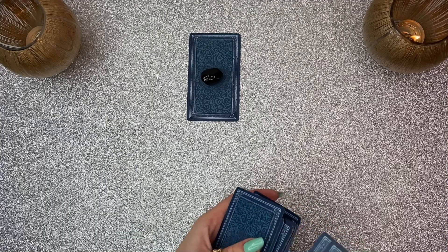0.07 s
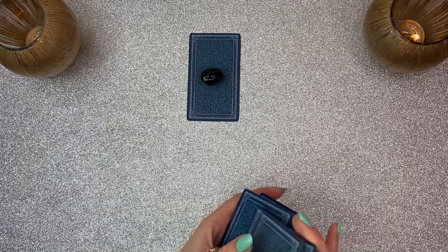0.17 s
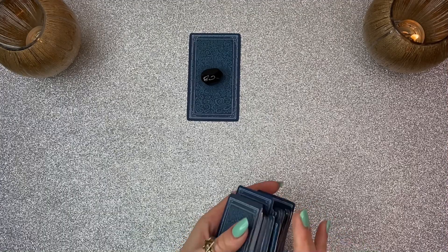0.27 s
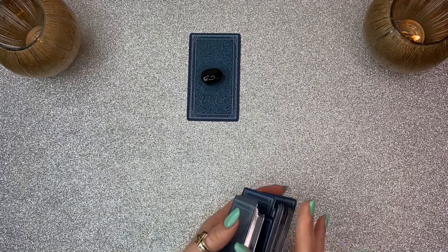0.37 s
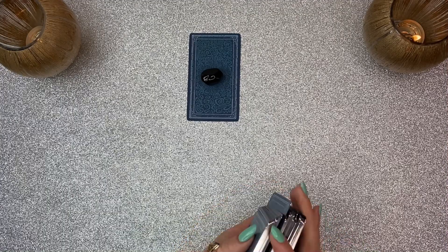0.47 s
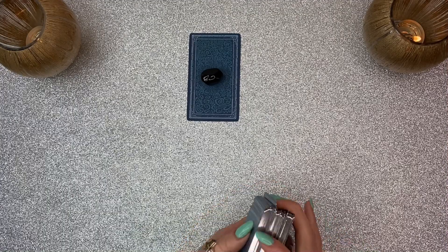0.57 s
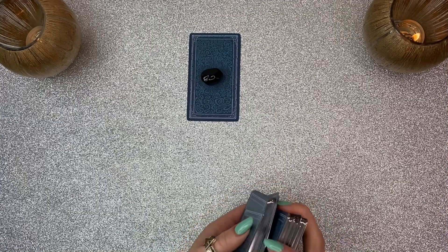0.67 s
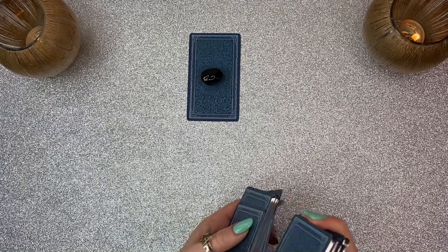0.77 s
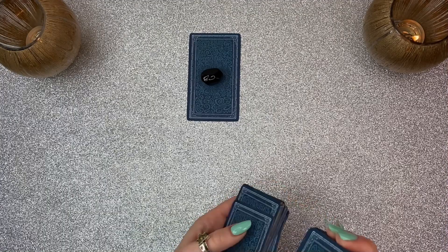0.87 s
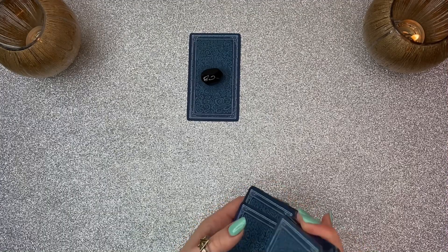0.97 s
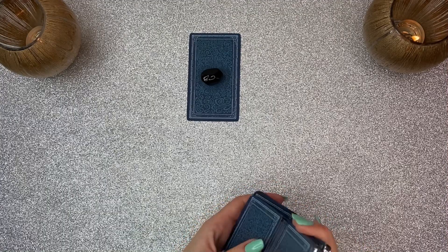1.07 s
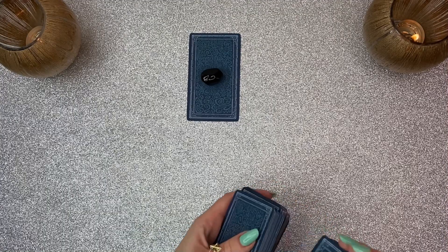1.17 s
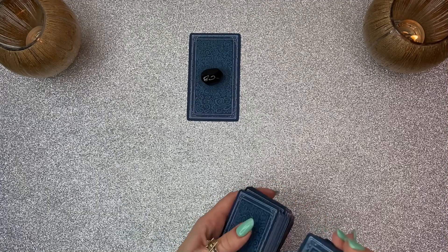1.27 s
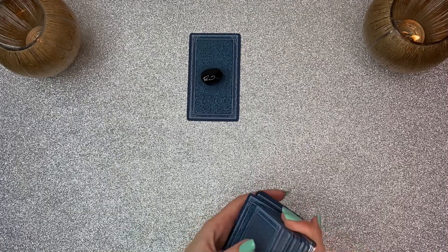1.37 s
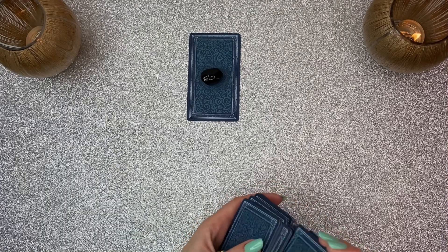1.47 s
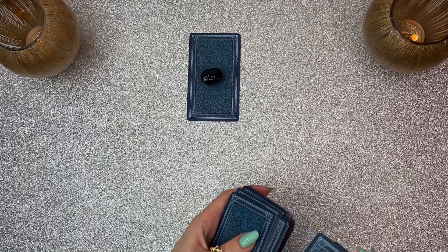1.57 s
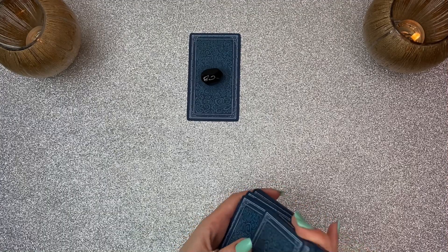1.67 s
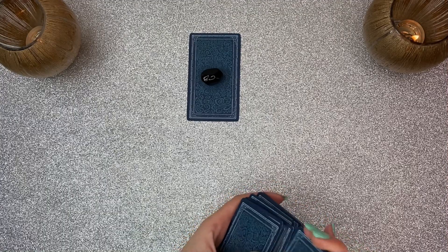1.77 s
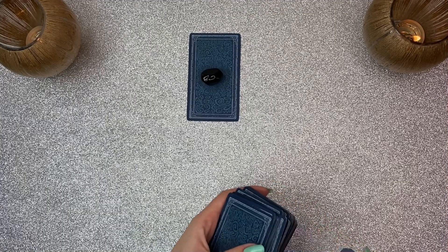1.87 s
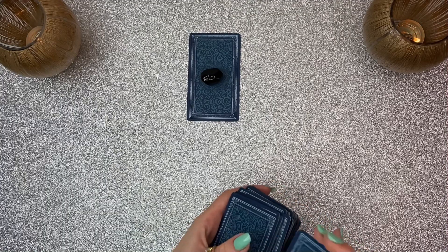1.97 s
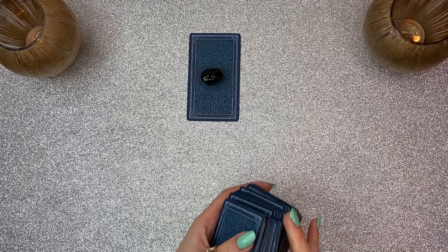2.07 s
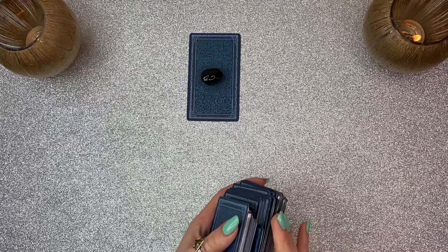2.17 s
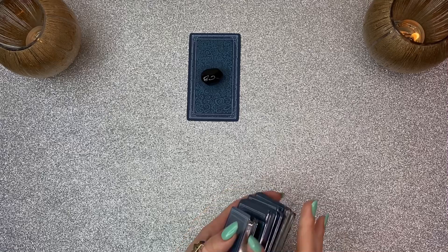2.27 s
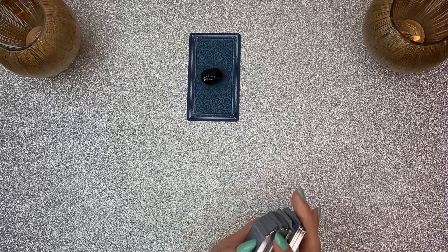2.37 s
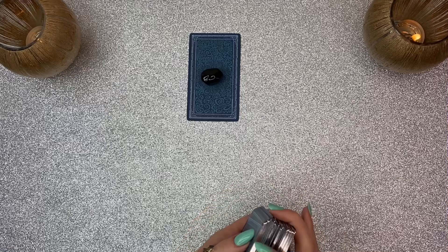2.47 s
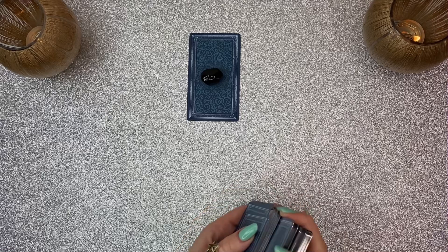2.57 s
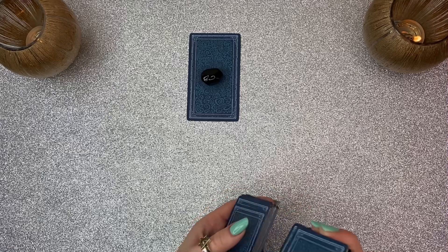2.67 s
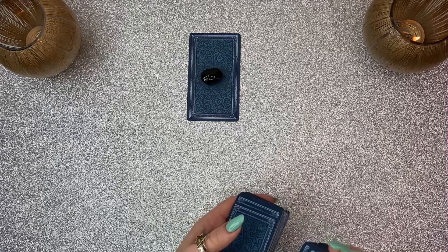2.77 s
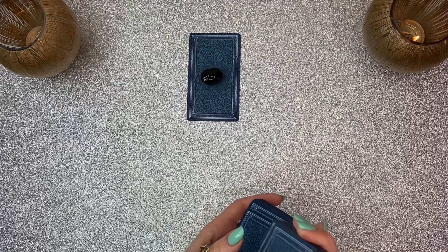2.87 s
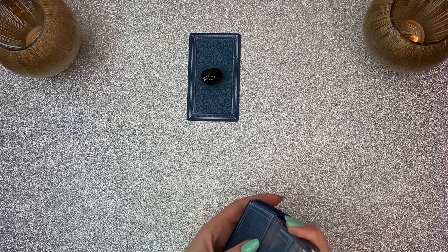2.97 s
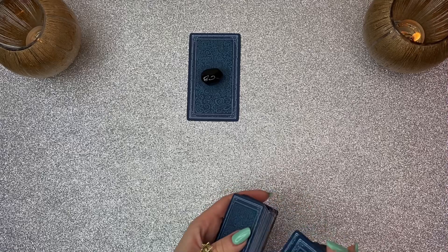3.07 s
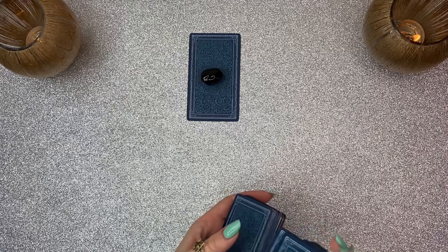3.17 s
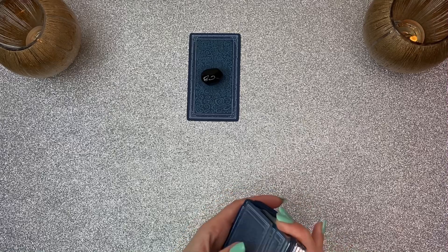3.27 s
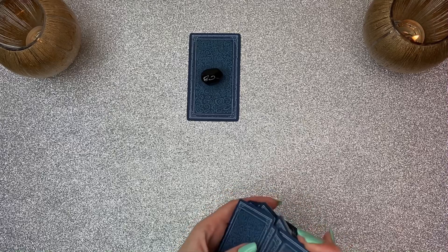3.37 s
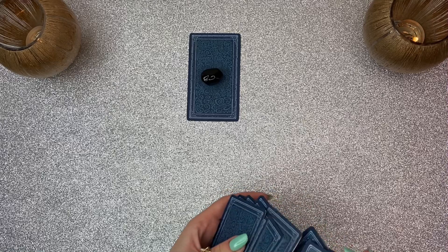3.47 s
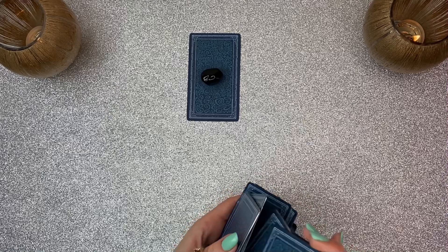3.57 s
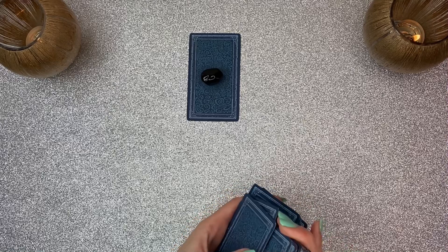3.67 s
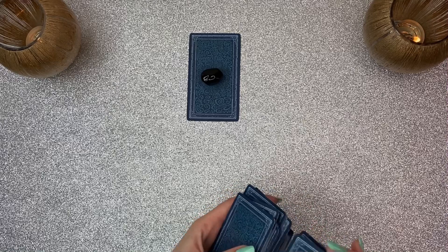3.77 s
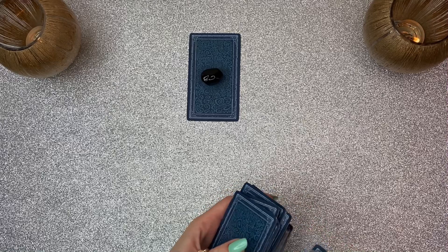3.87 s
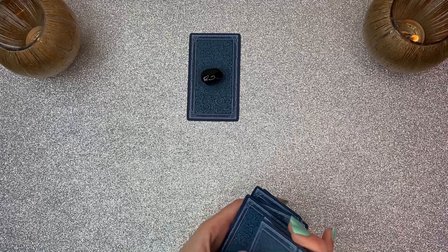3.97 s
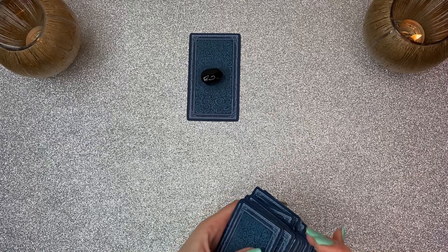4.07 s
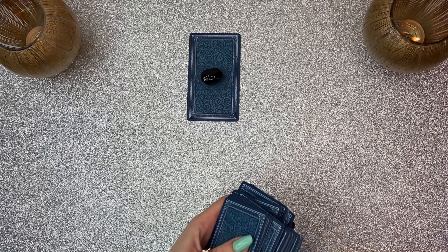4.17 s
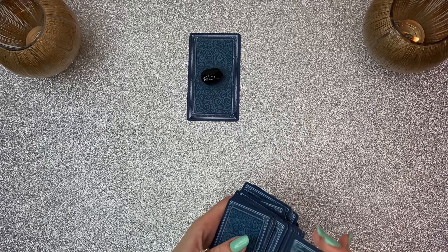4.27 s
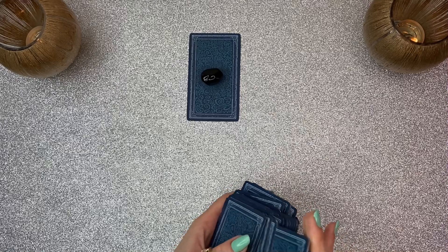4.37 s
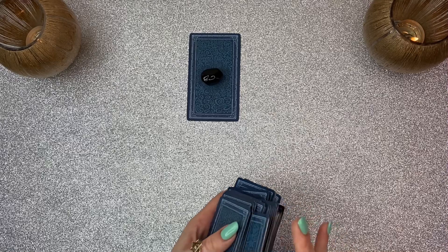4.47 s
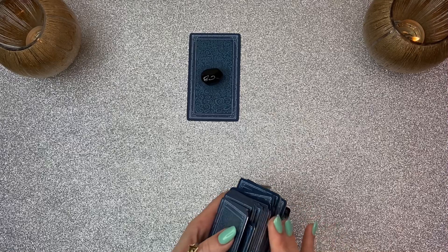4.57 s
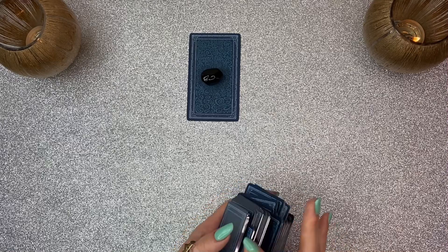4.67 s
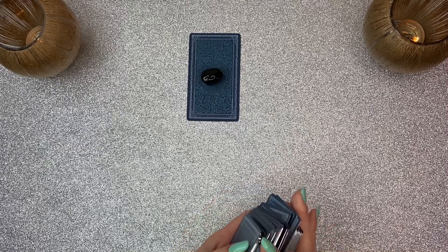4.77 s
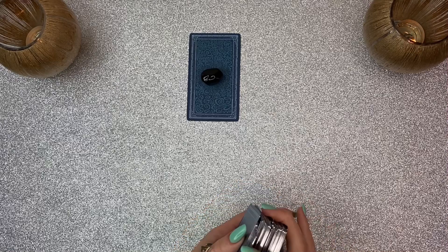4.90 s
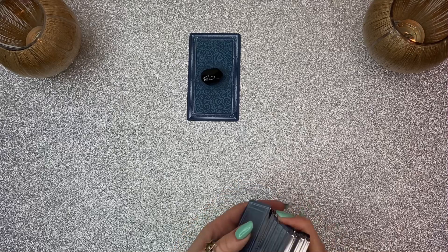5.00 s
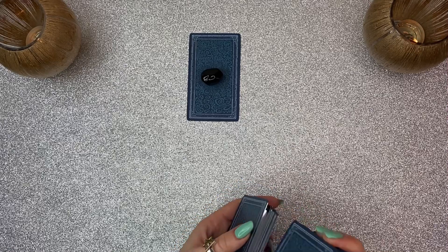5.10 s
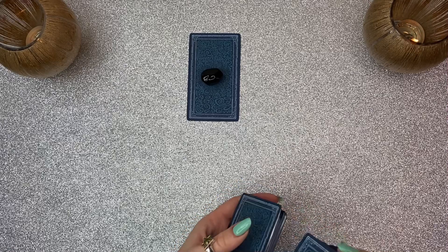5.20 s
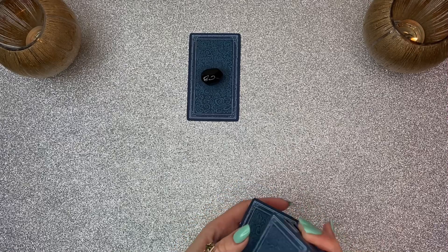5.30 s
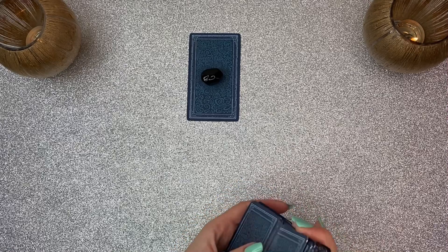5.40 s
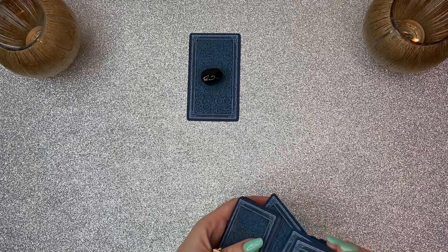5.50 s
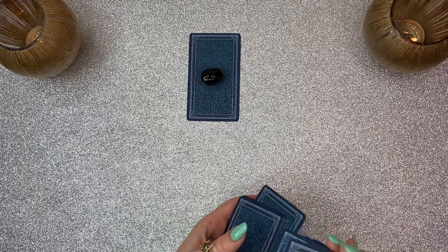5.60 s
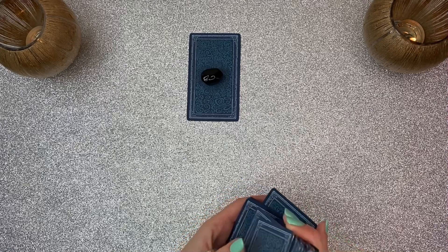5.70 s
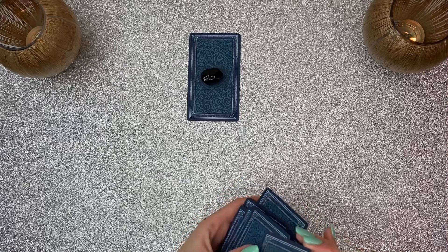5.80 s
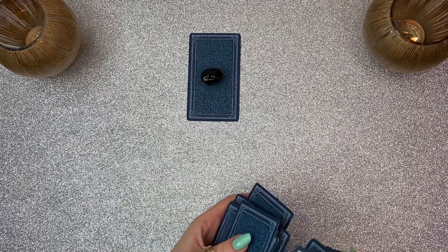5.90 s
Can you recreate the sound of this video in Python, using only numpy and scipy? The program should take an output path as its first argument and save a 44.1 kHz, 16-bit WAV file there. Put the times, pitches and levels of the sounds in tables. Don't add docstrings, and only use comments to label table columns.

```python
import sys
import numpy as np
from scipy import signal
from scipy.fft import rfft, irfft
from scipy.io import wavfile

SR = 44100
rng = np.random.default_rng(int(sys.argv[2]) if len(sys.argv) > 2 else 0)


def wav_record(signal):
    frames = np.transpose(np.atleast_2d(signal))
    bounded = np.clip(frames, -1, 1)
    quanta = np.round(bounded * 32767).astype(np.int16)
    wavfile.write(sys.argv[1], SR, quanta)


def ratio(d):
    e = np.asarray(d, float) / 20
    return 10 ** e


N = 261954


def rms_one(x):
    return x / np.sqrt(np.mean(x ** 2) + 1e-20)


def at_hz(points, hz):
    table_hz, values = np.array(points).T
    return np.interp(np.log(hz + 1), np.log(table_hz), values)


def shaped(x, spectrum):
    return irfft(rfft(x) * ratio(at_hz(spectrum, np.fft.rfftfreq(N, 1 / SR))), N)


def cut(x, hz, kind, order=2):
    sos = signal.butter(order, np.clip(hz, 10, .45 * SR), kind, fs=SR, output="sos")
    return signal.sosfilt(sos, x)


def resonance(x, hz, width_hz):
    r = np.exp(-np.pi * width_hz / SR)
    poles = [1, -2 * r * np.cos(2 * np.pi * hz / SR), r * r]
    return signal.lfilter([(1 - r * r) / 2, 0, (r * r - 1) / 2], poles, x)


def grit(shape, spread_db):
    sizes_db = spread_db * np.minimum(rng.exponential(1, shape), 4)
    return rms_one(rng.standard_normal(shape) * ratio(sizes_db))


# mode_hz [Hz], level_db [dB], t60_s [s]
PILE = [(280, -6.5, 0.027), (448.2, -13, 0.036), (580, 1, 0.021), (730, 6, 0.011), (840, 6.5, 0.013),
        (1055, 3.5, 0.0064)]
# start_s [s], peak_db [dB], pocket_hz [Hz], thump_db [dB re peak]; the next three alike
EDGE_FIRST = [(0.16, -42, 1170, -9.5), (0.801, -47.5, 848, -13), (0.81, -57, 890, -18),
              (1.032, -36, 1910, -7.5), (2.008, -25, 3140, -39), (2.055, -35.5, 3920, -8),
              (2.614, -62, 6500, -25), (2.631, -51, 5300, -30), (2.893, -41, 5240, -8.5),
              (2.927, -29, 1350, -6), (3.052, -39.5, 1070, -6), (3.28, -37.5, 2400, -27),
              (3.606, -35, 1480, -34), (3.646, -49.5, 1490, -4), (4.79, -45.5, 4540, -44),
              (5.11, -56.5, 544, -9), (5.461, -35, 430, -1), (5.488, -42, 417, 9.5),
              (5.886, -45, 1210, 0.5)]
FLAT = [(0.196, -33, 3300, -21), (0.512, -63, 2920, -37), (0.775, -45, 1710, -6), (1.104, -30, 4840, -23),
        (1.354, -37, 1690, -12.5), (1.489, -28.5, 3700, -25), (1.776, -31.5, 1210, -12),
        (1.797, -22, 2920, -8.5), (2.471, -64, 5270, -25), (2.502, -41.5, 3200, -39),
        (3.033, -37, 4560, -10.5), (3.267, -25.5, 1380, -55), (3.554, -46, 5100, -39),
        (3.623, -30.5, 5000, -28), (3.737, -37, 3270, -10.5), (3.755, -29, 4500, -32),
        (3.772, -32.5, 4670, -12.5), (4.001, -33, 5710, -15), (4.309, -18.5, 1976, -52),
        (4.778, -50, 5200, -38), (5.368, -30.5, 1590, -16.5), (5.385, -28, 1450, -13.5),
        (5.738, -30, 1770, -17.5), (5.817, -26.5, 950, -9.5)]
CUPPED = [(1.434, -37.5, 2360, -19), (1.716, -21, 1235, -46), (2.604, -50, 1300, -12),
          (2.659, -59, 1210, -24), (2.684, -47, 3020, -30), (2.773, -53.5, 1440, -13),
          (3.217, -56.5, 5500, -24), (3.38, -36.5, 3080, -27), (3.4, -38.5, 3240, -11),
          (3.593, -33.5, 3230, -17), (4.115, -28, 2700, -21), (4.306, -11, 3530, -47),
          (4.322, -28.5, 2400, -32), (4.37, -30, 3000, -17), (4.61, -46.5, 960, -1),
          (5.04, -41.5, 1804, -18.5), (5.38, -25.5, 1510, -21), (5.448, -47, 2730, -4),
          (5.798, -34, 1550, -15)]
SCUFFED = [(0.207, -38.5, 3620, -7.5), (0.287, -36, 4700, -33), (0.518, -36.5, 3000, -43),
           (0.66, -64, 4970, -43), (1.018, -52, 2700, -27), (1.691, -33.5, 5900, -40),
           (2.229, -33.5, 4650, -37), (3.979, -45.5, 5860, -18), (5.357, -45, 1450, -11),
           (1.376, -29, 6300, -26.5), (1.45, -38, 3300, -9), (4.685, -39, 2960, -23)]
# landings [table], crack_db [dB re peak], length_ms [ms]
LANDINGS = [(EDGE_FIRST, -1.5, 2.4), (FLAT, -10.5, 2.7), (CUPPED, -38, 2.8), (SCUFFED, -13.5, 7.0)]


def slaps():
    size, lead = SR // 10, SR // 80
    rush_db, rush_ms = -31, 5.3
    landings = sorted((*row, crack_db, ms) for rows, crack_db, ms in LANDINGS for row in rows)
    t = np.arange(size) / SR
    since_contact = t - lead / SR
    bursts = grit((len(landings), size), spread_db=6.5)
    strengths = rng.standard_normal((len(landings), len(PILE)))
    rush = ratio(rush_db) * np.exp(-np.abs(since_contact) * 1000 / rush_ms)
    out = np.zeros(N + size)
    for landing, noise, strength in zip(landings, bursts, strengths):
        start_s, peak_db, pocket_hz, thump_db, crack_db, ms = landing
        age = 1000 * np.maximum(since_contact, 0) / max(ms, .6)
        snap = signal.unit_impulse(size, lead + int(0.24 * ms * SR / 1000))
        swell = (1 - np.exp(-age / 0.45)) * np.exp(-age)
        burst = np.roll(noise, lead) * (swell + rush) + 1.7 * snap
        pocket = resonance(burst, pocket_hz, 170 + pocket_hz * (pocket_hz / 3600) ** 2)
        crack = cut(cut(burst, 930, "high"), 6100, "low", order=1)
        modes = 0
        for (hz, db, t60), k in zip(PILE, strength):
            modes = modes + ratio(db + 2 * k - 60 * t / t60) * np.sin(2 * np.pi * hz * t)
        thump = cut(signal.fftconvolve(snap + 0.027 * burst, modes)[:size], 290, "high")
        parts = [(pocket, -4), (thump, thump_db + 1.5), (crack, crack_db + 8.0)]
        packet = sum(ratio(db) * part / np.max(np.abs(part)) for part, db in parts)
        out[round(start_s * SR) - lead:][:size] += ratio(peak_db) * packet
    return out[:N]


# start_s [s], length_ms [ms], start_db [dB], end_db [dB]; the next three alike
PRESSED = [(0.335, 151, -51.5, -66), (0.5, 89, -56, -67), (1.425, 49, -48.5, -57), (1.69, 35.4, -53.5, -42),
           (1.74, 42, -43.5, -53.5), (2.01, 76, -42.5, -50.5), (2.46, 94, -63, -63),
           (2.893, 117, -52.5, -49), (3.21, 55, -75.5, -65.5), (3.35, 114, -51, -62),
           (3.555, 36, -48.5, -60), (3.604, 44, -43.5, -55), (3.95, 35, -88.5, -66), (3.979, 60, -46, -50),
           (4.65, 70, -52, -59.5), (5.352, 45, -50.5, -47.5), (5.41, 54, -55.5, -56.5),
           (5.74, 60, -53.5, -51.5)]
LOOSE = [(0.157, 77.5, -48, -49), (0.278, 43, -48.5, -55.5), (0.58, 107, -63.5, -53),
         (0.67, 112, -56, -69.5), (1.0, 24, -66, -54.5), (1.03, 55, -46, -46.5), (1.32, 42, -62, -80),
         (1.352, 46, -52.5, -50.5), (2.09, 90, -51, -60), (2.2, 37, -72, -48), (2.235, 78, -53.5, -58.5),
         (2.33, 54, -64, -70), (2.39, 73, -56.5, -70.5), (3.268, 120, -50, -65.5), (3.47, 88, -72, -55.5),
         (3.675, 86, -46.5, -58.5), (4.04, 77, -58, -66), (4.27, 16, -72, -74.5), (4.308, 120, -47.5, -55),
         (4.45, 115, -50.5, -51), (4.6, 44, -70, -61), (4.76, 107, -61, -56), (4.92, 85, -60.5, -63),
         (5.8, 47, -50, -45)]
MUFFLED = [
    (0, 65, -49.5, -70),
    (0.77, 87, -68, -73),
    (2.86, 32, -71, -79),
    (3.03, 33, -49, -68),
    (5.875, 51, -52, -67.5),
]
BRUSHED = [
    (0.87, 43, -66, -72.5),
    (2.57, 60, -77, -68),
    (5.0, 88, -68, -65),
    (5.1, 46, -90, -78),
    (5.69, 43.4, -97, -55),
]
# slides [table], body_db [dB re rub], edge_db [dB re rub]
GRIPS = [(PRESSED, -15.5, -3.9), (LOOSE, -24, -4), (MUFFLED, -11, -18), (BRUSHED, -11, 6.8)]


def pressure(grip_share, release_ms):
    powers = np.zeros((3, N + SR))
    strokes = [(*row, *tone) for rows, *tone in GRIPS for row in rows]
    for start_s, ms, start_db, end_db, body_db, edge_db in strokes:
        age = np.arange(int((ms + 6 * release_ms) * SR / 1000)) * 1000 / SR
        take_hold = 1 - np.exp(-age / (grip_share * ms))
        let_go = np.exp(-np.maximum(age - ms, 0) / release_ms)
        drift = ratio(np.interp(age, [0, ms], [start_db, end_db]))
        power = (drift * take_hold * let_go) ** 2
        powers[:, round(start_s * SR):][:, :len(age)] += power * ratio([[0], [2 * body_db], [2 * edge_db]])
    return np.sqrt(powers[:, :N])


def flutter(rate_hz, depth_db):
    return ratio(depth_db * rms_one(cut(rng.standard_normal(N), rate_hz, "low")))


# band_hz [Hz], level_db [dB per Hz]
CARD = [(200, -31), (450, -22.5), (900, -18), (1450, -9), (2200, -7.5), (3000, -4), (4200, -3), (5400, -3),
        (7000, -6), (9000, -4), (12000, -7), (14000, -12.5), (15800, -13)]


def slide():
    edge_hz = 8000
    rub, body, edge = pressure(grip_share=.13, release_ms=8.0)
    ticks = (rng.random(N) < 70 / SR) * rng.standard_normal(N)
    faces = shaped(grit((2, N), spread_db=4.0) + ratio(19) * ticks, CARD)
    splits_hz = np.geomspace(1150, edge_hz, 7)
    patches = 0
    for k in range(6):
        patches = patches + cut(faces[k % 2], splits_hz[k:k + 2], "band") * flutter(17, depth_db=1.45)
    rub = rub * ratio(-3.0) * rms_one(patches)
    body = body * ratio(-2.5) * rms_one(cut(faces[1], [330, 1150], "band")) * flutter(30, depth_db=1.0)
    edge = edge * ratio(1.0) * rms_one(cut(faces[0], edge_hz, "high", order=3))
    return (rub + body + edge) * flutter(32, depth_db=0.78)


# start_s [s], peak_db [dB]
TAPS = [
    (5.461, -46),
    (5.489, -43.5),
    (5.758, -50.5),
    (5.82, -56),
]
# mode_hz [Hz], level_db [dB], t60_s [s]
TABLE = [(117.6, -12, 0.22), (164.3, 4.5, 0.2), (211, -6, 0.054), (302, -5, 0.04)]


def taps():
    t = np.arange(SR // 4) / SR
    thud = sum(ratio(db - 60 * t / t60) * np.sin(2 * np.pi * hz * t) for hz, db, t60 in TABLE)
    knocks = np.zeros(N)
    for start_s, peak_db in TAPS:
        knocks[round(start_s * SR)] = ratio(peak_db)
    return signal.fftconvolve(knocks, thud / np.max(np.abs(thud)))[:N]


# peak_s [s], peak_db [dB]
SWINGS = [(0.0, -61), (0.21, -65.5), (0.4, -74), (0.58, -71), (0.79, -68.5), (1.06, -60.5), (1.4, -59.5),
          (1.52, -63), (1.82, -60.5), (2.03, -67), (2.251, -68), (2.45, -72.5), (2.65, -75), (2.94, -61),
          (3.06, -61), (3.29, -62.5), (3.5, -71), (3.69, -63.5), (3.9, -71), (4.0, -69), (4.12, -67.5),
          (4.348, -57.5), (4.52, -64), (4.75, -68), (5.05, -75), (5.23, -71), (5.51, -52.5), (5.76, -55.5)]


def stir():
    swell_db_per_s, settle_db_per_s = 170.5, 135
    peak_s, peak_db = np.transpose(SWINGS)[:, :, None]
    age = np.arange(N) / SR - peak_s
    level_db = np.max(peak_db + np.minimum(swell_db_per_s * age, -settle_db_per_s * age), axis=0)
    mid, side = rng.standard_normal((2, N))
    rumble = cut(mid + 0.12 * side * np.array([[1], [-1]]), [45, 140], "band")
    return ratio(level_db - 3.5) * rms_one(rumble)


# band_hz [Hz], t60_s [s]
ROOM_T60 = [(150, 0.55), (700, 0.14), (1500, 0.52), (3000, 0.41), (6000, 0.32), (10000, 0.2), (15000, 0.14)]
# band_hz [Hz], level_db [dB per Hz]
ROOM_LEVEL = [(100, -6.5), (400, 4.5), (900, -4.5), (1500, -3), (3000, -5.5), (6000, -1), (12000, -6.5)]
# band_hz [Hz], likeness [0 to 1]
ALIKE = [(100, 0.65), (400, 0.27), (1200, 0.16), (3000, 0.033)]


def room(x, early_db, early_ms, late_db):
    size = SR * 2 // 3
    t = np.arange(size) / SR
    white = rng.standard_normal((3, 2, size))
    tail = 0
    for k, hz in enumerate(80 * 2 ** np.arange(0, 8, .5)):
        band = cut(white[k % 2], [hz / 1.19, hz * 1.19], "band")
        tail = tail + band * ratio(at_hz(ROOM_LEVEL, hz) - 60 * t / at_hz(ROOM_T60, hz))
    tail = tail * (1 - np.exp(-t / 0.0012))
    early = cut(white[2], 500, "high", order=1) * np.exp(-1000 * t / early_ms)
    mid, side = rfft(ratio(late_db) * rms_one(tail) + ratio(early_db) * rms_one(early))
    alike = np.clip(at_hz(ALIKE, np.fft.rfftfreq(size, 1 / SR)), 0, 1)
    echo = irfft(np.sqrt(1 + alike) * mid + np.sqrt(1 - alike) * side * np.array([[1], [-1]]), size)
    return signal.fftconvolve(x[None], echo / np.sqrt(2 * size), axes=1)[:, :N]


# band_hz [Hz], level_db [dB per Hz]
HUSH = [(24, -52), (40, -18.5), (70, -15.5), (98, -3), (336, -9), (461, -18), (616, -18), (804, -18),
        (1400, -23), (6760, -24.5), (8210, -25.5), (13000, -33)]


def hush():
    air_db, hum_db = -79.5, -78.5
    mid, side, motor = rng.standard_normal((3, N))
    air = rms_one(shaped(mid + 0.26 * side * np.array([[1], [-1]]), HUSH))
    hum = rms_one(resonance(motor, hz=163, width_hz=7))
    return ratio(air_db) * air + ratio(hum_db) * hum


def scene():
    cards = slaps() + slide()
    echoes = room(cards, early_db=-3.5, early_ms=8.0, late_db=-8)
    return cards + taps() + echoes + stir() + hush()


def roll_off(x):
    return signal.sosfilt(signal.butter(12, 17040, fs=SR, output="sos"), x)


# band_hz [Hz], left_over_right_db [dB]
BALANCE_DB = [(100, 1.3), (400, .6), (900, -1.5), (1800, -3.3), (4500, -4), (6000, -4), (7600, -.6),
              (8200, 0)]
# band_hz [Hz], left_lead_rad [radians]
LEFT_LEAD = [(100, 0), (1500, -.2), (2600, -1), (4500, -.6), (6500, -.5), (7300, .4), (8200, 2.9),
             (9100, 3.4), (10400, 6.1), (11700, 6.45), (13000, 9.0), (14200, 9.9), (15300, 12.3),
             (17000, 12.7)]


def record(dry):
    shared_port_hz, top_hz = 7900, 15800
    hz, both = np.fft.rfftfreq(N, 1 / SR), rfft(dry)
    shared = 0.6 / (1 + (shared_port_hz / (hz + 1)) ** 24)
    both = (1 - shared) * both + shared * both[0]
    lead_rad = np.interp(hz, *np.transpose(LEFT_LEAD))
    offset = ratio(at_hz(BALANCE_DB, hz) / 2) * np.exp(.5j * lead_rad)
    x = irfft(both * [offset, 1 / offset], N)
    x = cut(x, 42, "high", order=3)
    x = signal.sosfilt(signal.ellip(10, .5, 45, top_hz, fs=SR, output="sos"), x)
    return roll_off(x)


dry = scene()
out = record(dry)
wav_record(out)
```